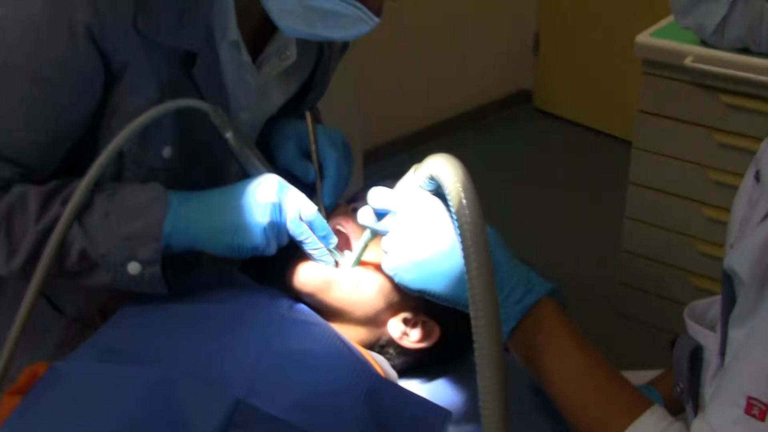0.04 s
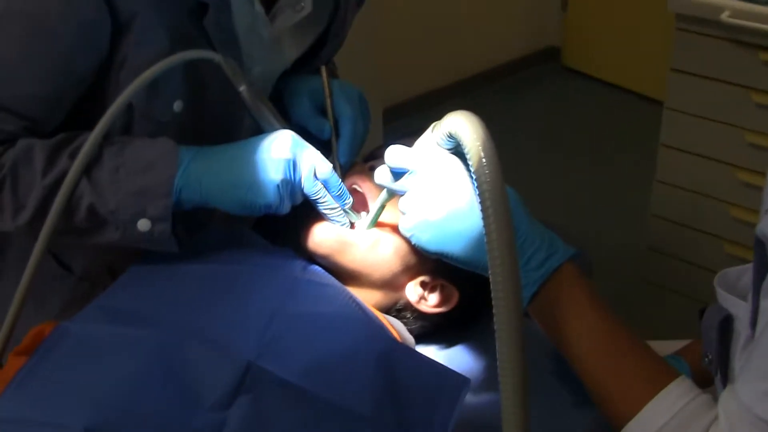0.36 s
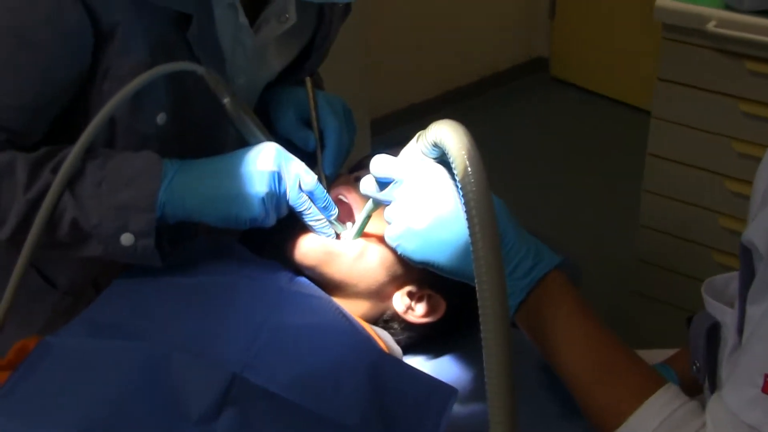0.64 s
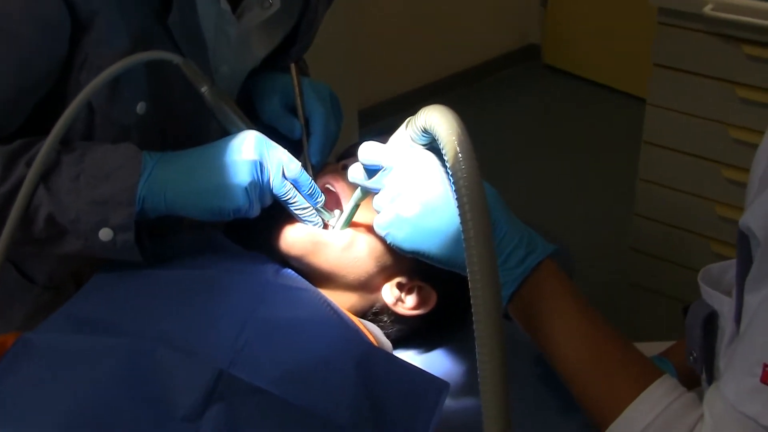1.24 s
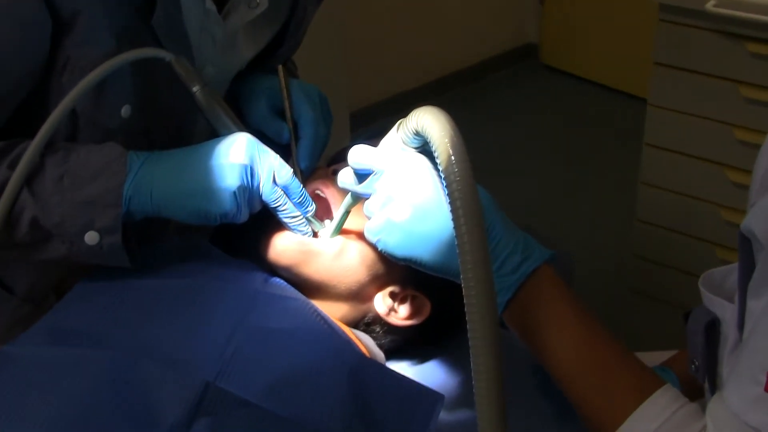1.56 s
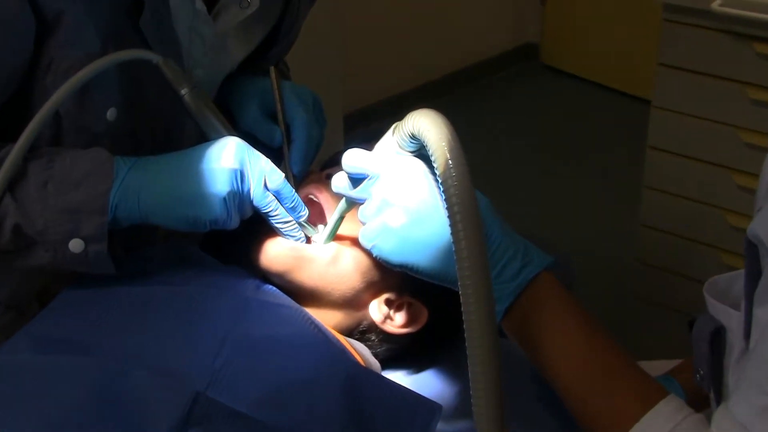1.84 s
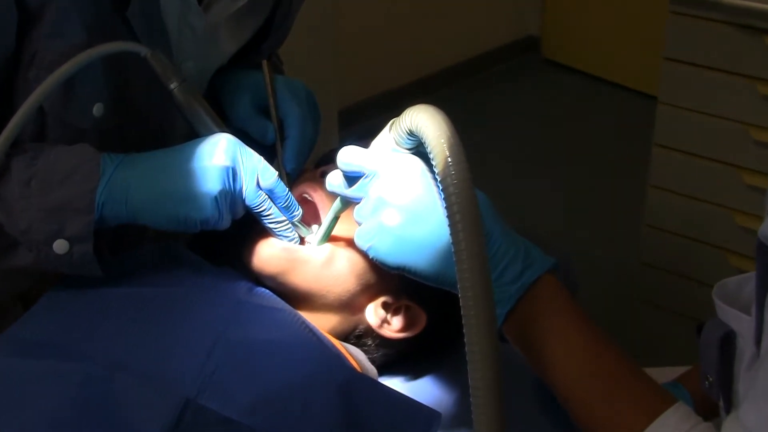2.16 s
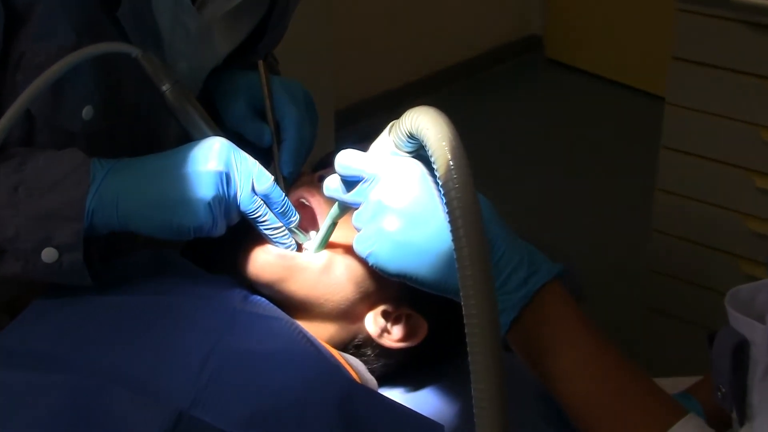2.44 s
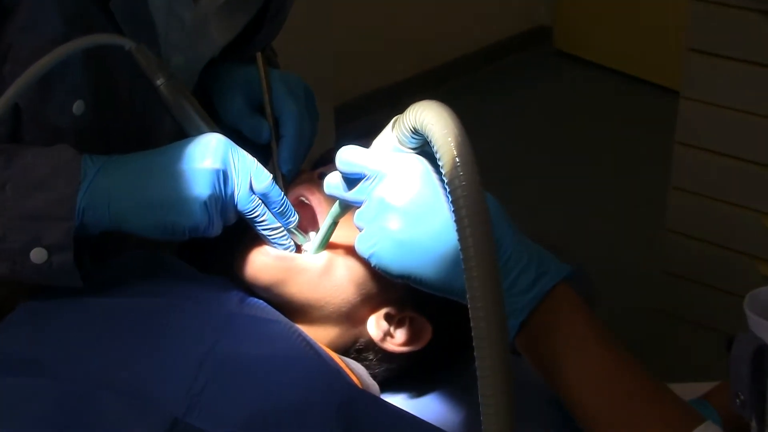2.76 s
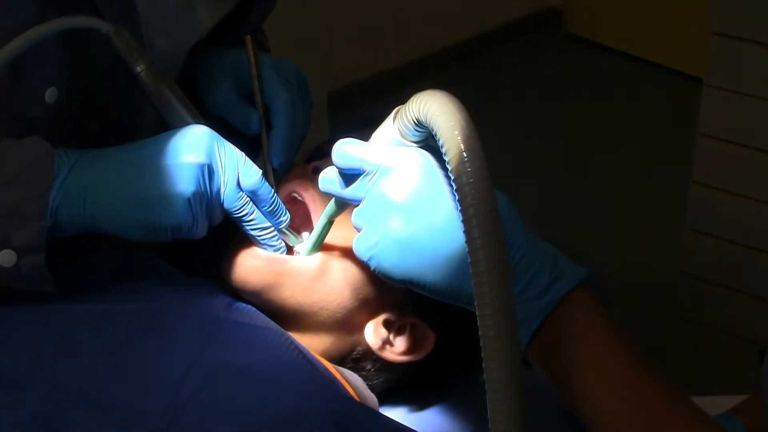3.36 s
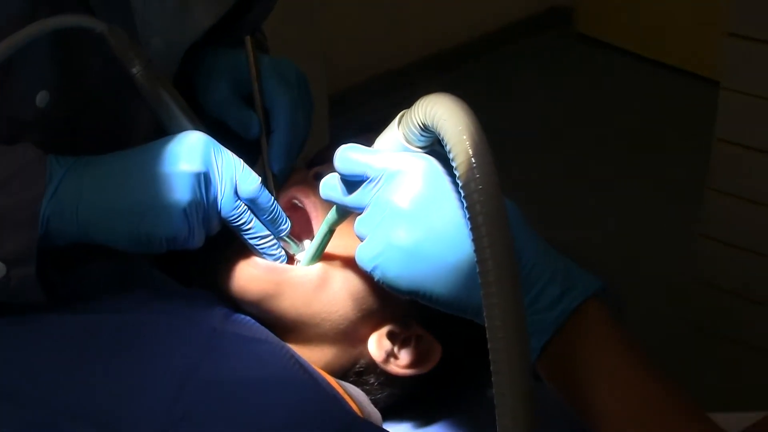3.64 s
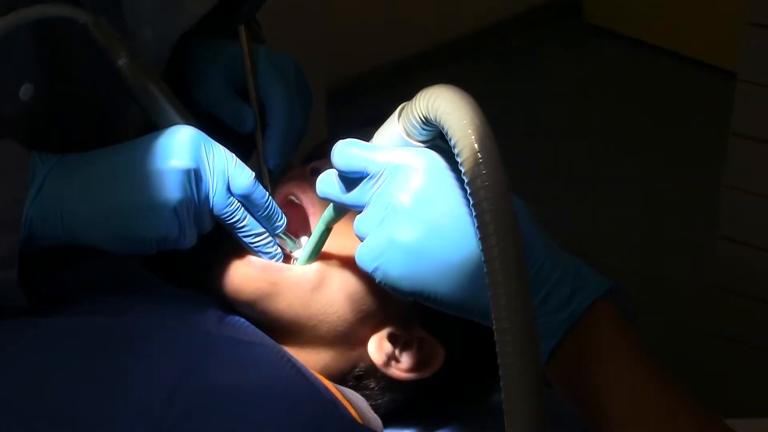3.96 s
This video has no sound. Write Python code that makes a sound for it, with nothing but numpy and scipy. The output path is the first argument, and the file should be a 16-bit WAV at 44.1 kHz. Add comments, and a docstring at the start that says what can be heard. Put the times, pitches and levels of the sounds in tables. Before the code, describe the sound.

Close up in a small clinic room, a dental suction tube in a patient's mouth hisses without pause. Hollow whistling tones rise and dip within the rushing air, with one mild slurp past the middle.

```python
"""Dental suction hose

A hose draws air steadily, close by in a small treatment room. Swirling air makes the hose
and mouth ring with hollow tones, while the tip hisses. Hard surfaces nearby add short echoes.
The sound is nearly mono, starts abruptly and has its loudness partly evened out."""
import sys
import numpy as np
from scipy import signal
from scipy.fft import rfft, irfft
from scipy.io import wavfile
from scipy.ndimage import uniform_filter1d, map_coordinates

SR = 44100
rng = np.random.default_rng(int(sys.argv[2]) if len(sys.argv) > 2 else 0)


def store_wav(level_fs):
    """Save 16-bit WAV to argv[1]."""
    pcm = np.round(np.clip(np.atleast_2d(level_fs), -1, 1) * 32767)
    wavfile.write(sys.argv[1], SR, pcm.T.astype(np.int16))


N = 176400
TIME = np.arange(N) / SR
HZ = np.maximum(np.fft.rfftfreq(N, 1 / SR), 1)

# broad rush of air in the hose (frequency [Hz], relative level [dB])
RUSH_SPECTRUM = [(25, -59), (65, -21.5), (125, -17.5), (190, -11), (340, -13.5), (500, -8), (900, -6.5),
                 (1250, -3.5), (1650, -7), (1900, -15.5), (2600, -18), (4500, -30)]
# how the rush changes as the tip shifts (time [s], level [dB])
RUSH_SWELL = [(0, 0), (.75, -0.7), (1.3, 0.4), (1.7, 0), (2.3, 0.3), (2.55, 1.5), (2.85, -1), (4, 0)]
# low drone of the air column (frequency [Hz], width [Hz], level [dB])
DRONE_TONES = [(160.7, 14, -48), (213.5, 25, -41), (243.6, 16, -37.5)]
# how the drone rises and falls (time [s], level [dB])
DRONE_SWELL = [(0, 4.5), (.55, -3), (.85, 1), (1.2, 3), (1.85, 2.5), (2.05, -5), (2.4, 0), (2.65, -2),
               (3.03, 3.5), (3.25, -2.5), (4, -3)]
# hollow ringing of hose and mouth (frequency [Hz], width [Hz], level [dB])
HOLLOW_TONES = [(411.7, 18, -43), (618, 26, -37), (708, 16, -41.5), (738.6, 20, -43.5), (860, 32, -40.5),
                (1026, 17, -37), (1088, 33, -36), (1161.4, 14, -32), (1251, 54, -32)]
# the hollow ringing swells once into a slurp (time [s], level [dB])
HOLLOW_SWELL = [(0, 0.5), (.6, -0.3), (1.1, -1.5), (1.35, -1), (1.7, 1.7), (2.1, 0.5), (2.38, 1.5),
                (2.53, 4.5), (2.8, 0), (3.5, 0), (4, 0.5)]
# the hoot, the strongest group of tones (frequency [Hz], width [Hz], level [dB])
HOOT_TONES = [(1352.3, 30, -24.5), (1424, 36, -27), (1462, 25.5, -29.5), (1485, 21, -35)]
# the hoot eases off and returns (time [s], level [dB])
HOOT_SWELL = [(0, -2.5), (.27, 4), (.42, -1), (.55, 2.5), (.76, -1.5), (.95, -.3), (1.15, -9), (1.25, 2),
              (1.5, -0.5), (2.0, 2.5), (2.2, -0.7), (2.55, 1.5), (2.75, -1.5), (3.25, 2.5), (3.58, -5),
              (3.75, -0.2), (4, -0.5)]
# weaker tones just above the hoot (frequency [Hz], width [Hz], level [dB])
UPPER_TONES = [(1582, 33, -35.5), (1651, 42, -36.5), (1783, 30, -39.5), (1882, 16, -46.5)]
# how those weaker tones rise and fall (time [s], level [dB])
UPPER_SWELL = [(0, 1), (.7, 0), (1.25, -6.5), (1.45, 3), (1.7, 4.5), (1.95, 1.5), (2.6, -1), (2.88, 3),
               (3.5, -5), (3.85, -2), (4, 1)]
# hiss at the tip (frequency [Hz], relative level [dB])
HISS_SPECTRUM = [(1500, -24), (2500, -10.5), (2950, -7.5), (3400, -0.5), (4200, -2), (4600, -5.5),
                 (5200, -6), (6900, -3), (8400, -1), (10400, -1.5), (11300, -7.5), (11700, -13),
                 (13000, -21), (14200, -38)]
# broad, high ringing of the tip (frequency [Hz], width [Hz], level [dB])
TIP_TONES = [(2075, 160, -34.5), (3384, 66, -41.5), (3598, 330, -31), (4036, 210, -27), (4260, 230, -35.5),
             (5440, 160, -35), (5770, 150, -38.5), (5950, 100, -38), (6760, 520, -27.5), (7180, 150, -36.5),
             (7765, 200, -31.5), (8090, 200, -35.5), (8810, 220, -31.5), (10220, 220, -33.5),
             (10430, 190, -34)]
# how the tip's sound rises and falls (time [s], level [dB])
TIP_SWELL = [(0, 0.5), (.45, -.5), (.62, 0.2), (1.12, 1), (1.35, 0), (1.5, 1), (1.75, -.6), (2.25, 0),
             (2.37, .4), (2.7, -0.5), (2.95, .4), (3.65, 0.2), (4, 0)]
# how much louder the right side is than the left (frequency [Hz], level [dB])
RIGHT_OVER_LEFT = [(120, -1), (300, 2), (700, 2), (1400, 1.5), (1900, -0.2), (2500, 0.5), (3200, 1.2),
                   (4000, 1.7), (10500, 2.5), (11500, 3.5), (12800, 13), (14000, 11)]
# faint hiss all around (frequency [Hz], relative level [dB])
SURROUND_SPECTRUM = [(60, -19), (230, -1), (500, -6), (1350, 6.5), (1900, -17), (2600, -17), (3300, -6),
                     (4000, -1), (5000, -5), (7500, 4), (10300, 3), (12500, 1.5), (13400, 0), (14200, -14)]

RUSH_DB, HISS_DB, SURROUND_DB = -25.5, -20.5, -33
HOSE_FLUTTER_DB, HOSE_FLUTTER_HZ = 1.23, 44
TIP_FLUTTER_DB, TIP_FLUTTER_HZ = 0.64, 35


def from_db(db):
    """Turn decibels into a number to multiply the sound by."""
    return 10 ** (np.asarray(db) / 20)


def unit_level(x):
    """Scale a signal so that its average strength (rms) is 1."""
    return x / np.sqrt(np.mean(x ** 2) + 1e-20)


def over_time(table):
    """Join a table's points into a level for every sample."""
    return np.interp(TIME, *np.transpose(table))


def over_frequency(table):
    """Join a table's points into a level for every frequency."""
    hz, db = np.transpose(table)
    return np.interp(np.log(HZ), np.log(hz), db)


def drift(rate_hz):
    """A smooth random wobble, mostly slower than rate_hz."""
    white = rfft(rng.standard_normal(N))
    return unit_level(irfft(white / (1 + (HZ / rate_hz) ** 2), N))


def air_noise(spectrum):
    """Swirling air makes noise; the table sets how strong its lows and highs are."""
    white = rfft(rng.standard_normal(N))
    return unit_level(irfft(white * from_db(over_frequency(spectrum)), N))


def add_echoes(x, count=24, longest_s=.022, echo_db=-14.5):
    """Sound bounces off cabinets, floor and chair as a cluster of short echoes."""
    delays = (rng.uniform(.1, 1, count) * longest_s * SR).astype(int)
    signs = rng.choice([-1, 1], count)
    echoes = sum(sign * np.roll(x, delay) for sign, delay in zip(signs, delays))
    return x + from_db(echo_db) * echoes / np.sqrt(count)


def ringing(tones):
    """Swirling air makes a hollow space ring at its own pitches; wider tones sound breathier."""
    total = 0
    for hz, width_hz, db in tones:
        decay = np.exp(-np.pi * width_hz * np.sqrt(2) / SR)
        resonator = [1 - decay, 0, decay - 1, 1, -2 * decay * np.cos(2 * np.pi * hz / SR), decay * decay]
        noise = rng.standard_normal(N + SR)   # an extra second lets the ringing build up
        tone = signal.sosfilt([resonator, resonator], noise)[SR:]   # twice, for quiet between tones
        total = total + from_db(db) * unit_level(tone)
    return total


def hose():
    """Air rushes and rings in hose and mouth, swelling as the tip shifts and fluttering with the flow."""
    rush = from_db(RUSH_DB) * add_echoes(air_noise(RUSH_SPECTRUM))
    rush *= from_db(over_time(RUSH_SWELL))
    groups = [(DRONE_TONES, DRONE_SWELL), (HOLLOW_TONES, HOLLOW_SWELL),
              (HOOT_TONES, HOOT_SWELL), (UPPER_TONES, UPPER_SWELL)]
    ring = sum(ringing(tones) * from_db(over_time(swell)) for tones, swell in groups)
    flutter_db = HOSE_FLUTTER_DB * drift(HOSE_FLUTTER_HZ)
    return (rush + ring) * from_db(flutter_db)


def tip():
    """Air hisses through the narrow opening and makes it ring."""
    hiss = from_db(HISS_DB) * air_noise(HISS_SPECTRUM)
    ring = pitch_wander(ringing(TIP_TONES))
    sound = add_echoes(hiss + ring)
    flutter_db = TIP_FLUTTER_DB * drift(TIP_FLUTTER_HZ)
    return sound * from_db(over_time(TIP_SWELL) + flutter_db)


def pitch_wander(x, share=.005, rate_hz=2):
    """The pitch drifts by a small share as the opening changes."""
    speed = 1 + share * drift(rate_hz)
    return map_coordinates(x, [np.cumsum(speed)], order=5, mode="mirror")


def scene():
    """The suction sits slightly to the right, with a faint hiss around it."""
    sides = np.array([[-1], [1]])   # left, right
    balance = from_db(sides * over_frequency(RIGHT_OVER_LEFT) / 2)
    suction = irfft(rfft(hose() + tip()) * balance, N)
    surround = sides * from_db(SURROUND_DB) * air_noise(SURROUND_SPECTRUM)
    return suction + surround


def record(dry):
    """An automatic volume control evens the level; the sound cuts in and loses its highest treble."""
    window_s, target_db, pull = 0.067, -15.5, 0.24   # pull: share of the way to the target
    start_s, cutoff_hz = .0775, 13800
    power = uniform_filter1d(np.mean(dry ** 2, axis=0), int(window_s * SR))
    level_db = 10 * np.log10(power + 1e-12)
    evened = dry * from_db(pull * (target_db - level_db))
    low_pass = signal.ellip(10, .1, 80, cutoff_hz, fs=SR, output="sos")
    return signal.sosfilt(low_pass, evened * (TIME >= start_s))


dry = scene()
out = record(dry)
store_wav(out)
```